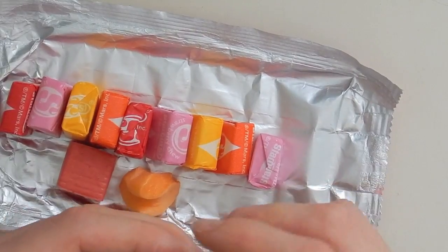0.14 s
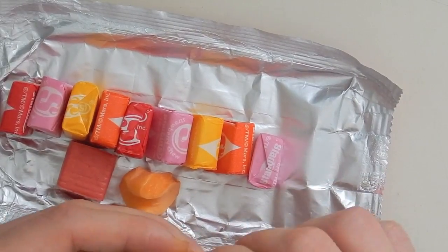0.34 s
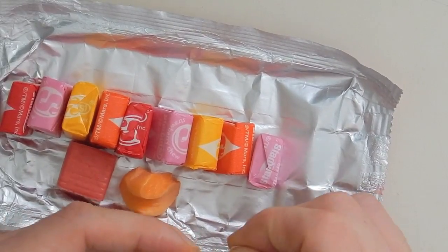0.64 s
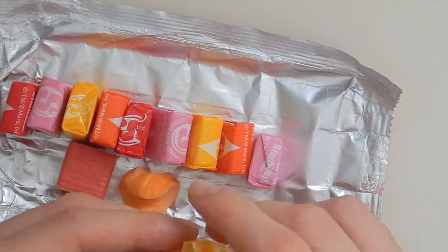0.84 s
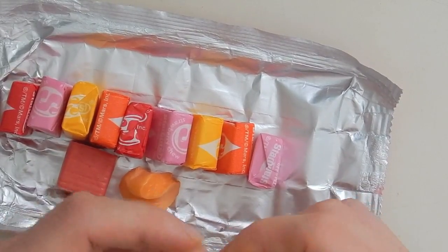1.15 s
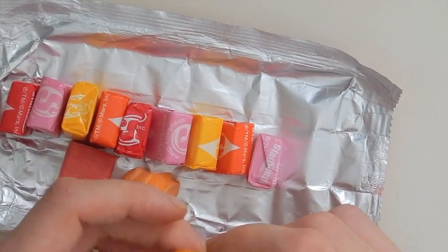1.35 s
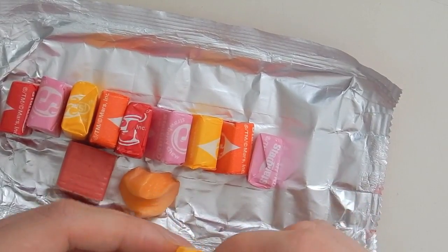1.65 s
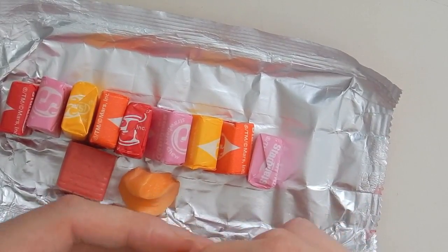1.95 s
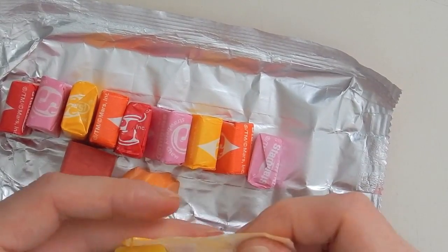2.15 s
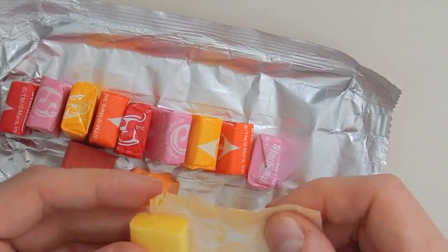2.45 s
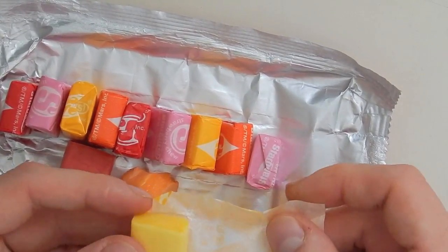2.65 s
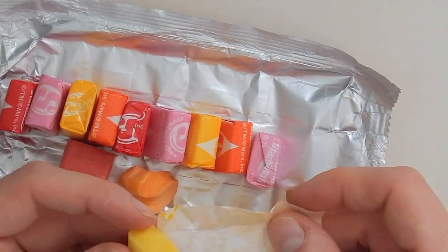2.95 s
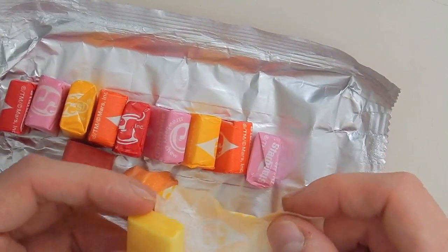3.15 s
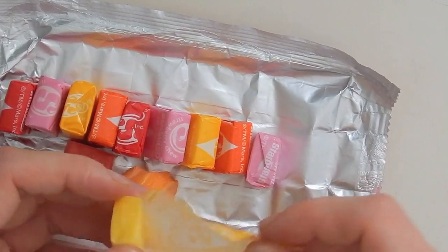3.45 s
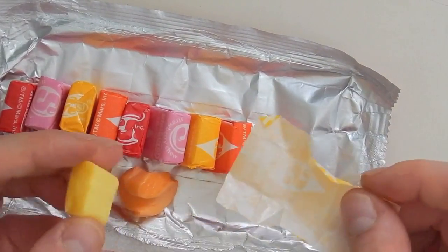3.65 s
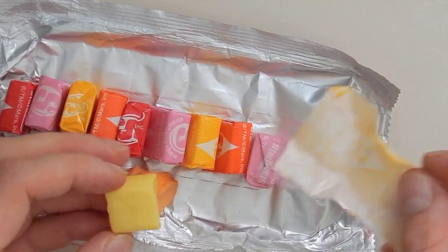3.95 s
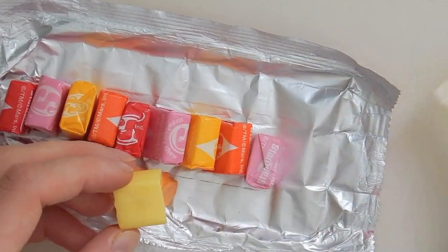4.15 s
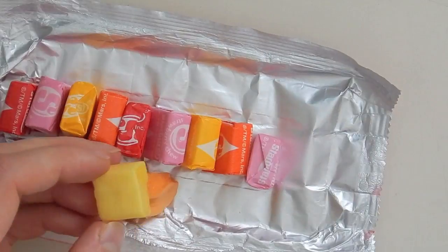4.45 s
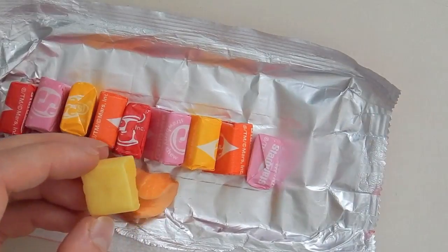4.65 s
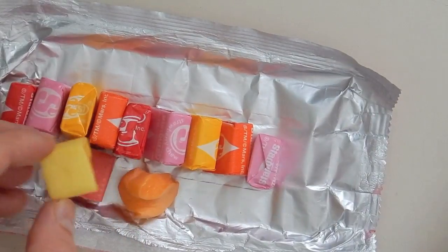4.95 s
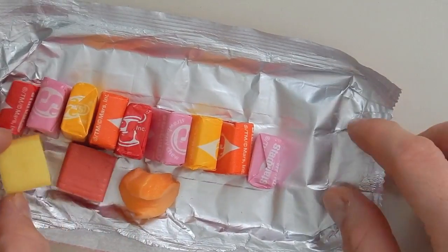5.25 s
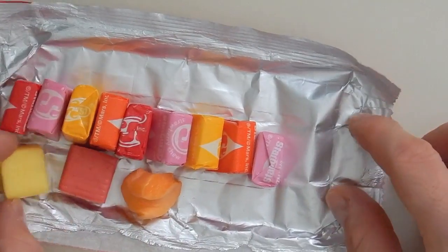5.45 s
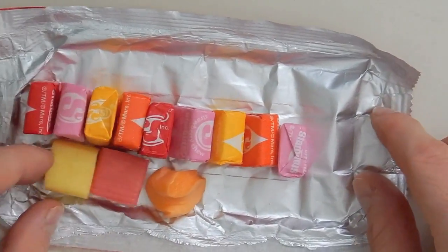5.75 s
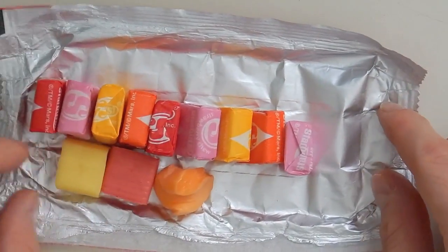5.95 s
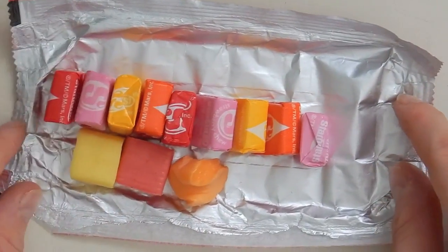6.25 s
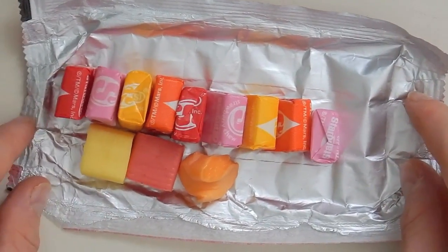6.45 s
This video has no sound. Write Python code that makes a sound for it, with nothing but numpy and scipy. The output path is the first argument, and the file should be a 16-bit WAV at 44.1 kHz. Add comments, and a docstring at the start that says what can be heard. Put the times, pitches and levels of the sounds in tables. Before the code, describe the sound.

A low steady appliance hum with soft air noise fills a small room throughout, and a distant engine's deep note drifts faintly underneath, rising, dipping near 2.5 s, rising again and sinking at the end. Close up, a faint rustle begins around 0.2 s, then a dense volley of bright, sharp paper ticks at 0.5-0.8 s. Sparser crinkles and light rustles follow from 1.0 to 1.9 s. Strong snaps and hollow papery pops return at 2.0-2.35 s, then isolated crackles and a tight cluster around 2.85-3.0 s. A tick at 3.25 s leads to a duller, stronger flap at 3.55 s as the paper comes free. Tiny ticks sound near 4.1-4.25 s. Around 4.6-4.85 s soft candy bumps gently on foil. From 5.2 to 6.35 s the foil slides in short, hissing, finely crackling pushes, then only the hum remains.

```python
"""Fingers peel the waxed paper off a chewy candy, close to the microphone, then slide a foil wrapper about.
Each crease that buckles gives a bright tick and rings the sheet around it; tiny buckles and rubbing rustle.
Pulled taut, the sheet flaps like a damped drumhead; the bare candy lands on the foil with soft noise bumps.
The foil slides in a dense, crackling hiss. A small room answers with decaying, filtered noise.
An appliance hums in it under rushing air, and the firing note of an engine drones faintly outside."""
import sys
import numpy as np
from scipy import signal
from scipy.fft import rfft, irfft, next_fast_len
from scipy.io import wavfile
from scipy.ndimage import uniform_filter1d

SR = 44100
rng = np.random.default_rng(int(sys.argv[2]) if len(sys.argv) > 2 else 0)


def transcribe(u):
    """Save the signal u as a 16-bit wav file named by the first command-line argument.

    u: samples, shape (n,) or (channels, n), limited to [-1, 1]; the rate is SR.
    q: integer samples, one column per channel.
    """
    v = np.clip(np.atleast_2d(u).T, -1, 1)
    q = np.round(v * 32767).astype(np.int16)
    wavfile.write(sys.argv[1], SR, q)


N = 291042
TIME = np.arange(N) / SR

# moves of the fingers on the paper and the candy, levels ahead of the trims of each layer:
# [start t/s, length t/s, fine rustle level/dB, its resonance f/Hz, sheet flexing level/dB]
FINGER_MOVES = [(0.169, 0.21, -62.5, 8100, -75), (0.574, 0.039, -32.5, 9400, -50.5),
                (0.65, 0.11, -48.5, 10000, -72), (0.809, 0.036, -45.5, 7400, -50.5),
                (0.987, 0.016, -48.5, 7000, -52), (1.048, 0.17, -53, 9100, -63.5),
                (1.255, 0.035, -53, 8500, -59.5), (1.359, .1, -48, 9470, -56),
                (1.62, 0.2, -55.5, 9500, -71), (1.904, 0.037, -45, 7030, -60),
                (2.016, 0.13, -43.5, 9500, -53), (2.203, 0.089, -52, 9000, -57.5),
                (2.425, 0.064, -60.5, 8000, -59), (2.966, 0.007, -51, 9340, -38.5),
                (3.085, 0.12, -66.5, 7000, -57.5), (3.35, 0.1, -66, 7500, -66),
                (3.549, 0.014, -45, 7480, -41), (3.637, 0.025, -53.5, 9500, -65),
                (4.582, 0.03, -50.5, 3560, -55.5), (4.719, 0.17, -66.5, 8000, -64.5)]
# the grip tightens, lets go, and eases while held
ATTACK_DB_PER_S, RELEASE_DB_PER_S, EASE_DB_PER_S = 521, 389, 13
# how well the sheet radiates: [f/Hz, level/dB]
SHEET_RADIATION = [(250, 4), (550, -3), (850, -6.5), (1200, -4.5), (1700, -1.5), (2100, -6), (3200, -1.5),
                   (4000, -5), (6000, -3), (10000, -1), (13000, -4), (16000, -12)]


def undb(db):
    """Decibels to gain."""
    return 10 ** (np.asarray(db) / 20)


def unit(x):
    """Scale to an rms of 1."""
    return x / np.sqrt(np.mean(x ** 2))


def colour(x, points):
    """Filter by a spectrum of (f/Hz, level/dB) points, joined by straight lines over log frequency."""
    hz, db = np.transpose(points)
    size = next_fast_len(x.shape[-1], True)
    bins = np.maximum(np.fft.rfftfreq(size, 1 / SR), 1)
    gain = undb(np.interp(np.log(bins), np.log(hz), db))
    return irfft(rfft(x, size) * gain, size)[..., :x.shape[-1]]


def resonate(x, hz, q):
    """A two-pole resonance, kept well below the top of the band and no wider than it can hold."""
    top_hz = .4 * SR
    hz = min(hz, top_hz)
    return signal.lfilter(*signal.iirpeak(hz, max(q, hz / top_hz), fs=SR), x)


def walk(rate):
    """Slow random drift with an rms of 1, from random steps at this rate in Hz, smoothed twice."""
    size = int(SR / rate)
    steps = np.repeat(rng.standard_normal(N // size + 1), size)
    smooth = uniform_filter1d(uniform_filter1d(steps, size), size)
    return unit(smooth[:N])


def stereo(pair, side_db):
    """Left and right from a shared and an opposed signal."""
    return pair[0] + undb(side_db) * pair[1] * np.array([[1], [-1]])


def appliance(waver_db=1.0, drift=0.025):
    """A slightly wavering mains hum over rushing air; the bass is nearly alike in both ears."""
    # mains hum, rms ahead of the waver: [f/Hz, level/dB]
    hum_partials = [(120, -42), (240, -67.5), (360, -68.5)]
    # colour of the air and motor noise, relative: [f/Hz, level/dB]
    air_colour = [(20, -24), (45, -16), (52, -0.5), (60, -5.5), (86, -1.5), (101, -6), (125, 4), (150, -8),
                  (200, 2), (260, -3), (370, -17), (900, -23), (3000, -35), (15000, -49)]
    phase = 2 * np.pi * TIME
    wander = drift * walk(4.6)  # radians
    hum = sum(undb(db) * np.sqrt(2) * np.sin(hz * phase + wander + rng.uniform(0, 2 * np.pi))
              for hz, db in hum_partials)
    air = unit(colour(rng.standard_normal((2, N)), air_colour)) * undb(-48)
    # the difference between the ears is weak in the bass
    air[1] = colour(air[1], [(80, -24.0), (250, -19.0), (700, -7.0), (3000, -2)])
    return hum * undb(waver_db * walk(9.0)) + stereo(air, side_db=2.0)


def engine(unsteady_db=2.5, drift_hz=1.295):
    """Only the firing note of a far engine gets through the walls."""
    # the engine pulls through two gears and coasts, ahead of drift and unsteadiness:
    # [t/s, firing rate f/Hz, level/dB]
    drive = [(0, 77.5, -56), (2.1, 86, -58), (2.5, 65.7, -68), (2.7, 68.7, -51), (3.05, 73.8, -62),
             (3.4, 80, -54.5), (3.95, 86, -55), (4.35, 90.3, -49), (4.6, 92.7, -55), (5.7, 84.5, -55),
             (6.6, 55, -67)]
    s, hz, db = np.transpose(drive)
    firing_hz = np.interp(TIME, s, hz) + drift_hz * walk(8.3)
    phase = 2 * np.pi * np.cumsum(firing_hz) / SR
    level_db = np.interp(TIME, s, db) + unsteady_db * walk(9.2)
    return np.sqrt(2) * np.sin(phase) * undb(level_db)


def stroke(start, length, attack, release, ease):
    """Level in dB of one movement: it swells, eases off while it lasts and dies away (slopes in dB per s)."""
    t = TIME - start
    swell = attack * np.minimum(t, 0)
    sag = ease * np.clip(t, 0, length)
    return swell - sag - release * np.maximum(t - length, 0)


def handling():
    """Levels in dB of the fine rustle and of the flexing: the strongest move of the fingers rules."""
    levels = np.full((2, N), -100.)
    for start, length, fine_db, _, flex_db in FINGER_MOVES:
        shape = stroke(start, length, ATTACK_DB_PER_S, RELEASE_DB_PER_S, EASE_DB_PER_S)
        levels = np.maximum(levels, shape + np.array([[fine_db], [flex_db]]))
    return levels


def swarm(rate, scatter_db, grain_s):
    """Tiny buckles of very unequal size, each a brief puff of noise; rate per second."""
    sizes = undb(scatter_db * np.minimum(rng.exponential(size=N), 5))
    buckles = (rng.random(N) < rate / SR) * sizes
    # the energy of each puff dies away; the tiny floor keeps it above zero
    energy = signal.lfilter([1], [1, -np.exp(-2 / (grain_s * SR))], buckles ** 2 + 1e-12)
    return np.sqrt(energy) * rng.standard_normal((2, N))


def patchy(x, depth_db, rate, count=26):
    """A handled sheet keeps changing shape and contact, so its narrow resonances come and go."""
    centres = np.geomspace(700, 15000, count)
    step = centres[1] / centres[0]
    out = 0
    for hz in centres:
        band = colour(x, [(hz / step ** 2, -70), (hz / step, -16), (hz, 0),
                          (hz * step, -16), (hz * step ** 2, -70)])
        out = out + band * undb(depth_db * np.clip(walk(rate), -2, 2))
    return out


def rub(friction, moves, slopes, ring_db, q):
    """Each movement [start t/s, length t/s, level/dB, f/Hz] draws its own resonance out of the friction noise."""
    out = 0
    for start, length, db, hz in moves:
        ringing = unit(friction + undb(ring_db) * resonate(friction, hz, q))
        out = out + ringing * undb(db + stroke(start, length, *slopes))
    return out


def rustle(levels, fine_db=-3, flex_db=-3):
    """The paper rubs on itself with a fine crackle, and sounds lower where it bends."""
    # colour of the fine rustle, relative: [f/Hz, level/dB]
    fine_colour = [(1500, -31.5), (3000, -11.5), (4500, -8), (6500, -4), (9000, -4), (11000, -6),
                   (13500, -10.5), (16000, -41)]
    # colour of the flexing sheet, relative: [f/Hz, level/dB]
    flex_colour = [(400, -35), (800, 1.5), (1200, 5), (1750, 5.5), (2200, -0.5), (3200, -9), (4000, -16.5),
                   (8000, -31)]
    grains = swarm(rate=1100, scatter_db=3.3, grain_s=0.0005)
    grains = patchy(grains, depth_db=4, rate=50)
    slopes = ATTACK_DB_PER_S, RELEASE_DB_PER_S, EASE_DB_PER_S
    rubs = [move[:4] for move in FINGER_MOVES]
    bright = rub(colour(grains, fine_colour), rubs, slopes, ring_db=-2, q=2.9) * undb(fine_db)
    low = unit(colour(grains, flex_colour)) * undb(levels[1] + flex_db)
    return stereo(bright, side_db=-3.5) + stereo(low, side_db=-19.0)


def small_creases(rate=36, tick_db=-3.0, sheet_db=0.5, scatter_db=5.0, tick_hz=8600, sheet_hz=1750, spread=0.15):
    """Moves flip lesser creases at random, about as strong as the move itself; rows as snaps() takes them."""
    rows = []
    for start, length, fine_db, _, flex_db in FINGER_MOVES:
        gaps = rng.uniform(.2, 1.8, 16)
        chances = np.clip(rng.standard_normal((16, 4)), -2, 2)
        delays = (np.cumsum(gaps) - .5) / rate
        for delay, (a, b, c, d) in zip(delays, chances):
            if delay < length:
                rows.append((start + delay, fine_db + tick_db + scatter_db * a, tick_hz * np.exp(spread * b),
                             flex_db + sheet_db + scatter_db * c, sheet_hz * np.exp(spread * d)))
    return rows


def burst(t, decay_s, ring_db, ring_s, jerk_db):
    """Bending waves scatter over the creases: a sharp, jerky crack, then a weaker flutter."""
    jerks = np.repeat(np.clip(rng.standard_normal(len(t) // 16), -1.5, 1.5), 16)
    crack = np.exp(-t / decay_s) * undb(jerk_db * jerks)
    flutter = undb(ring_db) * np.exp(-t / ring_s)
    return rng.standard_normal((2, len(t))) * (crack + flutter)


def at_level(pair, db):
    """Set the rms level of the first four milliseconds."""
    head = pair[:, :int(.004 * SR)]
    return pair * undb(db) / np.sqrt(np.mean(head ** 2, axis=1, keepdims=True))


def panel(flap, hz, q=3.66, skirt_q=0.21, detune=0.14, uneven_db=4.0, lowest_share=0.54):
    """The panel beside a crease rings with a few modes, different for every fold, and fades steeply below them."""
    # modes of a panel, ahead of detuning and unevenness: [multiple of its centre, level/dB]
    modes = [(0.56, -8.5), (1, 6.5), (1.3, -4), (1.95, -1.5), (2.6, -7)]
    chances = np.clip(rng.standard_normal((len(modes), 2)), -2, 2)
    out = 0
    for (ratio, db), (a, b) in zip(modes, chances):
        mode_hz = hz * ratio * np.exp(detune * a * (ratio - 1))
        ringing = resonate(resonate(flap, mode_hz, q), mode_hz, skirt_q)
        out = out + at_level(ringing, db + uneven_db * b)
    steep = signal.butter(4, lowest_share * hz, "high", fs=SR, output="sos")
    return signal.sosfilt(steep, out)


def snaps(creases, squeeze, free_width_hz=2400, damping_hz=2800, lowest_share=0.63, swell_s=0.00059):
    """A crease flips with a tick, longer if the buckle runs along it; the wider sheet follows later and lower."""
    t = np.arange(1024) / SR
    out = np.zeros((2, N + len(t)))
    for s, crack_db, crack_hz, body_db, body_hz in creases:
        start = int(s * SR)
        # a tick dies in a few cycles; a hard squeeze makes the buckle run on
        decay_s = 7.5 / crack_hz + 0.002 * squeeze[start]
        crack = burst(t, decay_s, ring_db=-9.5, ring_s=0.0046, jerk_db=-0.5)
        # a loose crease rings in a narrow band; the fingers damp a squeezed one
        width_hz = free_width_hz + damping_hz * squeeze[start]
        # a small crease cannot radiate much below its own note
        steep = signal.butter(4, lowest_share * crack_hz, "high", fs=SR, output="sos")
        tick = signal.sosfilt(steep, resonate(crack, crack_hz, crack_hz / width_hz))
        flap = burst(t, decay_s=0.00059, ring_db=-14.5, ring_s=0.0047, jerk_db=-5.0)
        sheet = panel(flap * (1 - np.exp(-t / swell_s)), body_hz)
        out[:, start:start + len(t)] += stereo(at_level(tick, crack_db), side_db=-7.5)
        out[:, start:start + len(t)] += stereo(at_level(sheet, body_db), side_db=-16.5)
    return colour(out[:, :N], SHEET_RADIATION)


def flaps(q=2.43, swell_s=0.00058):
    """The taut sheet pops like a small, heavily damped drumhead."""
    # the whole sheet is pulled taut or comes free of the candy, ahead of radiation: [t/s, level/dB, note f/Hz]
    pulls = [(0.5815, -39, 1200), (0.606, -40, 1120), (0.6134, -41, 1080), (2.0222, -44, 1000),
             (2.0683, -48, 680), (2.1425, -31.5, 960), (2.1621, -40, 1010), (2.2957, -45, 920),
             (2.3354, -38, 940), (2.7152, -37.5, 980), (2.863, -37.5, 910), (2.9745, -37, 980),
             (2.9871, -35.5, 990), (3.5515, -34.5, 780), (3.5564, -28, 810), (3.5624, -40.5, 1140),
             (3.573, -41, 720)]
    t = np.arange(1024) / SR
    out = np.zeros((2, N + len(t)))
    for s, db, hz in pulls:
        start = int(s * SR)
        push = burst(t, decay_s=0.0009, ring_db=-11, ring_s=0.004, jerk_db=1.5) * (1 - np.exp(-t / swell_s))
        pop = at_level(resonate(resonate(push, hz, q), hz, q / 2), db)
        out[:, start:start + len(t)] += stereo(pop, side_db=-31)
    return colour(out[:, :N], SHEET_RADIATION)


def knocks():
    """The soft candy lands with a dull thump, and the foil under it settles."""
    # the bare candy bumps on the foil-covered table: [t/s, level/dB]
    bumps = [(4.6958, -44), (4.7093, -51), (4.729, -53), (4.753, -51), (4.7997, -49.5), (4.8542, -54)]
    # colour of such a bump, relative: [f/Hz, level/dB]
    candy_colour = [(300, -12), (800, -8), (1500, 1), (2300, -6), (3200, -12.5), (10000, -10.5),
                    (16000, -24)]
    t = np.arange(2048) / SR
    out = np.zeros((2, N + len(t)))
    for s, db in bumps:
        start = int(s * SR)
        thump = colour(burst(t, decay_s=0.0018, ring_db=-9, ring_s=0.014, jerk_db=3), candy_colour)
        out[:, start:start + len(t)] += stereo(at_level(thump, db), side_db=-9)
    return out[:, :N]


def slide(foil_db=-3.0, attack_db_per_s=260, release_db_per_s=280, ease_db_per_s=17):
    """The wrinkles of the foil catch and slip on the table in a dense, finely crackling hiss."""
    # pushes that slide the foil, ahead of foil_db: [start t/s, length t/s, level/dB, resonance f/Hz]
    pushes = [(5.423, 0.16, -63.5, 8400), (5.203, 0.16, -58.5, 8100), (5.512, 0.072, -51, 7250),
              (5.63, 0.18, -52.5, 5830), (5.96, 0.04, -54.5, 8600), (5.996, 0.025, -48, 8200),
              (6.026, 0.011, -50, 6800), (6.165, 0.035, -52.5, 6600), (6.268, 0.069, -58, 5900)]
    # colour of the sliding foil, relative: [f/Hz, level/dB]
    foil_colour = [(900, -1), (1600, 3), (2300, -2.5), (3000, 2), (4500, 1.5), (6500, 2), (9000, 5),
                   (11000, 0), (13000, -5), (16000, -28)]
    grains = swarm(rate=3000, scatter_db=2.8, grain_s=.0007)
    hiss = colour(patchy(grains, depth_db=3, rate=60), foil_colour)
    slopes = attack_db_per_s, release_db_per_s, ease_db_per_s
    return stereo(rub(hiss, pushes, slopes, ring_db=-1, q=1.9) * undb(foil_db), side_db=-7.5)


def room(x, wet_db=-8, t60_s=0.23, first_s=0.0066, early_db=-9):
    """The table scatters a little at once; the walls answer later, wide only in the treble."""
    # what the walls send back: [f/Hz, level/dB]
    wall_colour = [(300, -0.5), (1500, 1.5), (4000, 1.5), (8000, -1), (11000, 4), (15000, -12)]
    t = np.arange(SR // 2) / SR
    shape = np.where(t > first_s, 1, undb(early_db)) * np.exp(-np.log(1000) * t / t60_s)
    echoes = unit(rng.standard_normal((2, len(t))) * shape)
    tail = colour(echoes, wall_colour) / np.sqrt(len(t))
    tail[1] = colour(tail[1], [(500, -32), (1100, -30), (2000, 0.0), (8000, 0.5)])
    tail = stereo(tail, side_db=0)[:, :int(.4 * SR)]
    mono = x.mean(axis=0, keepdims=True)
    return signal.fftconvolve(mono, tail, axes=1)[:, :N] * undb(wet_db)


def scene(pan_db=-1, light_grip_db=-62, hard_grip_db=-36):
    """The wrapper sits close, a little to the right of the microphone, in the humming room."""
    # creases of paper and foil that buckle, ahead of radiation:
    # [t/s, tick level/dB, tick centre f/Hz, sheet level/dB, sheet centre f/Hz]
    big_creases = [(0.3997, -31, 9700, -44, 1280), (0.5418, -23.5, 9100, -72, 1500),
                   (0.5535, -25, 9550, -32, 1880), (0.5642, -33.5, 7260, -39.5, 2600),
                   (0.5776, -27, 8300, -38, 2120), (0.5969, -28, 8450, -26, 2230),
                   (0.6066, -24, 8240, -37, 1790), (0.6145, -47, 9200, -42, 1500),
                   (0.6428, -27.5, 7750, -33, 2480), (0.6713, -32.5, 8900, -42, 2130),
                   (0.7171, -39, 5900, -35, 2400), (0.7322, -37, 7500, -35.5, 1956),
                   (0.7414, -42, 7780, -41, 1750), (0.7786, -42, 9100, -36.5, 2100),
                   (0.8428, -43, 7100, -45, 1950), (1.05, -43, 9180, -57, 1190),
                   (1.1155, -31, 6350, -45.5, 1790), (1.1464, -46, 6800, -47, 2260),
                   (1.3503, -40, 7800, -44, 1720), (1.3932, -35, 8100, -33, 1720),
                   (1.4411, -54, 8750, -54, 1750), (1.6201, -32, 9100, -45, 2000),
                   (1.6657, -42, 8800, -39, 1826), (1.6844, -38.5, 9550, -64, 1500),
                   (1.818, -48.5, 7060, -41, 1880), (1.8271, -36.5, 10030, -69, 1500),
                   (1.8878, -36, 11200, -66, 1500), (1.8954, -35.5, 9150, -61, 1750),
                   (2.0043, -23, 7140, -26, 1860), (2.0214, -42, 8470, -37, 1480),
                   (2.0485, -40, 8000, -35, 1910), (2.0681, -27.5, 8000, -37, 1156),
                   (2.0824, -40, 8580, -48, 1400), (2.1124, -38, 10400, -42, 1510),
                   (2.121, -28.5, 9100, -34, 1290), (2.142, -60, 8900, -39.5, 1260),
                   (2.1613, -28, 9400, -24, 1700), (2.2951, -35.5, 6960, -37.5, 1897),
                   (2.3355, -20.5, 6630, -37.5, 1840), (2.6156, -69, 5380, -39.5, 1990),
                   (2.7156, -39, 8000, -35.5, 1990), (2.7245, -50, 6100, -34.5, 1800),
                   (2.7751, -46.5, 10500, -53, 1960), (2.8624, -32.5, 8440, -32.5, 1740),
                   (2.8764, -48, 8000, -41.5, 1750), (2.9416, -39, 7470, -32, 1900),
                   (2.9477, -27, 7500, -48, 1816), (2.9565, -25.5, 8000, -29.5, 1930),
                   (2.959, -25.5, 9200, -35, 1933), (2.9625, -34, 9300, -29.5, 2400),
                   (2.9745, -33, 6440, -29.5, 2290), (2.979, -49, 8050, -32.5, 1660),
                   (2.9871, -27.5, 7900, -27, 1627), (3.002, -52, 9300, -49, 1700),
                   (3.2448, -33, 4470, -35, 2000), (3.2645, -50, 8180, -43, 1840),
                   (3.5139, -45.5, 8170, -47, 1610), (3.5234, -43, 8590, -50, 1700),
                   (3.5375, -42, 6420, -38, 1940), (3.5572, -32, 7200, -29, 1780),
                   (4.1246, -39.5, 10500, -50, 1600), (4.137, -40.5, 10400, -49.5, 1610),
                   (4.2565, -44, 6250, -50.5, 2300), (5.3872, -55, 8000, -49.5, 2190),
                   (5.498, -37, 9050, -43, 2130), (5.7064, -38.5, 8500, -45.5, 2200),
                   (5.7114, -47, 8400, -56, 1600), (5.7349, -46, 9650, -56, 1500)]
    background = appliance() + engine()
    levels = handling()
    # 0 for a light grip, 1 for a hard one
    squeeze = np.interp(levels[0], [light_grip_db, hard_grip_db], [0, 1])
    wrapper = rustle(levels) + slide()
    wrapper = wrapper + snaps(big_creases + small_creases(), squeeze) + flaps() + knocks()
    wrapper = wrapper * undb(np.array([[pan_db], [-pan_db]]) / 2)
    return wrapper + room(wrapper) + background


def record(dry):
    """The recorder cuts the top, steeply above 16 kHz."""
    return signal.sosfilt(signal.ellip(8, .2, 70, 16000, fs=SR, output="sos"), dry)


dry = scene()
out = record(dry)
transcribe(out)
```